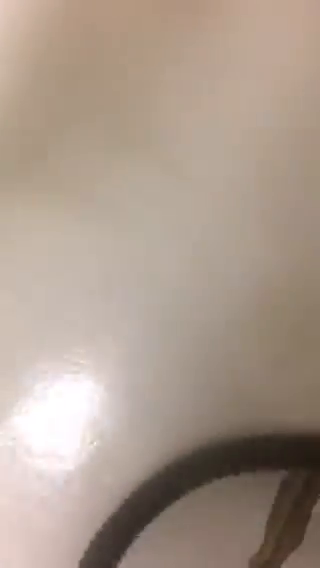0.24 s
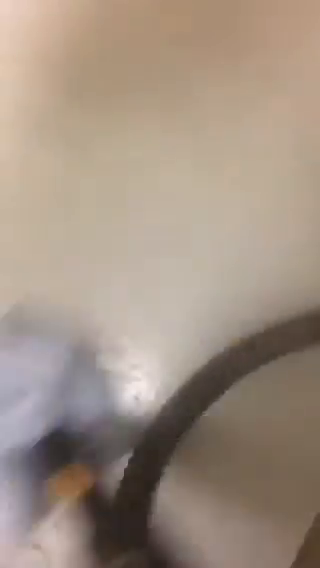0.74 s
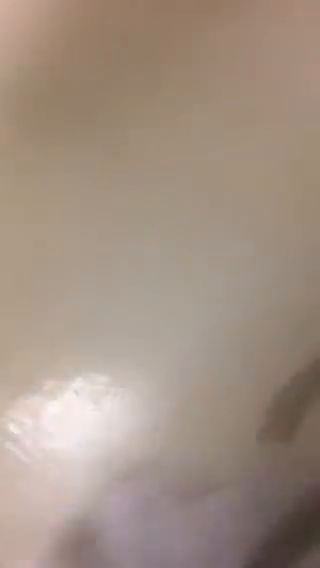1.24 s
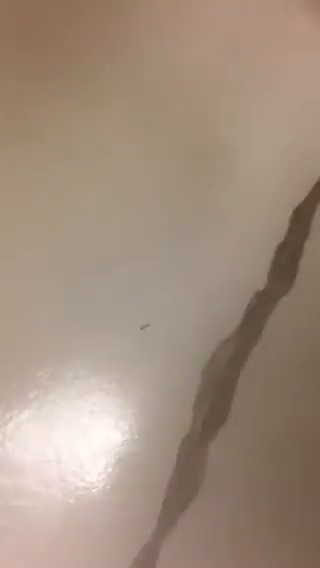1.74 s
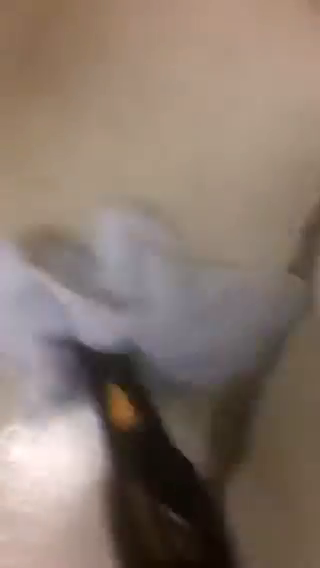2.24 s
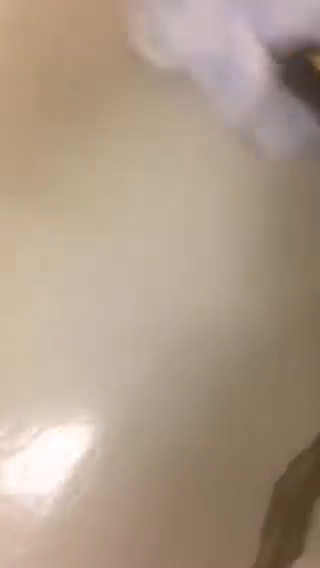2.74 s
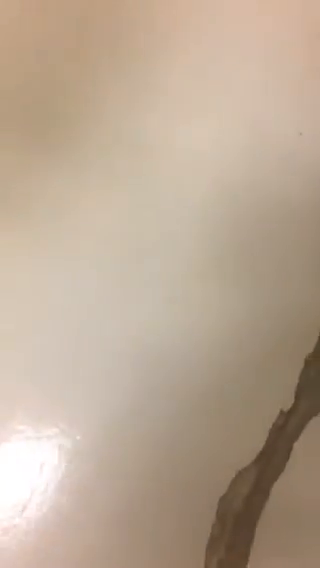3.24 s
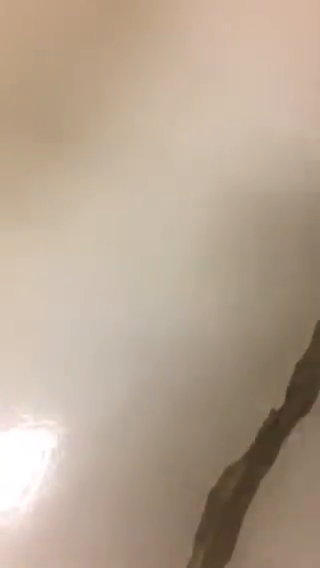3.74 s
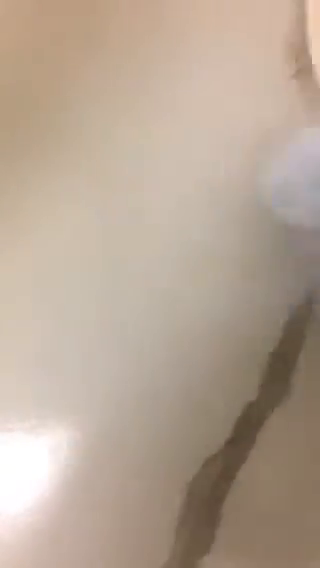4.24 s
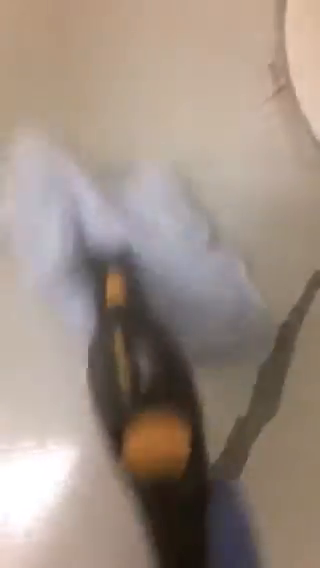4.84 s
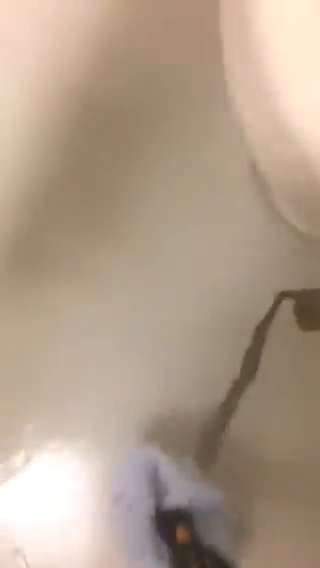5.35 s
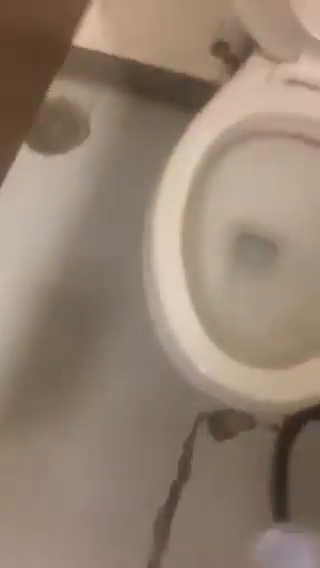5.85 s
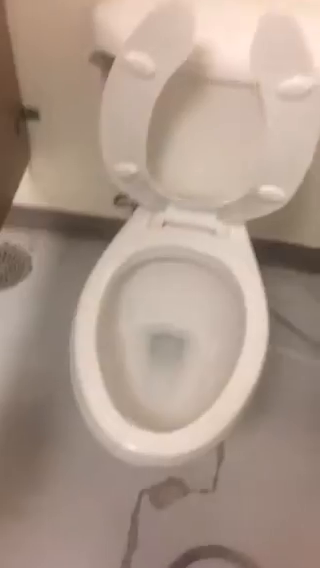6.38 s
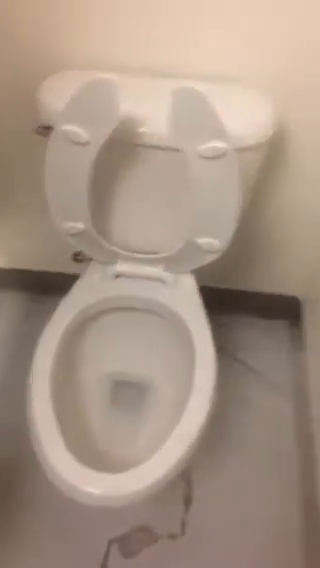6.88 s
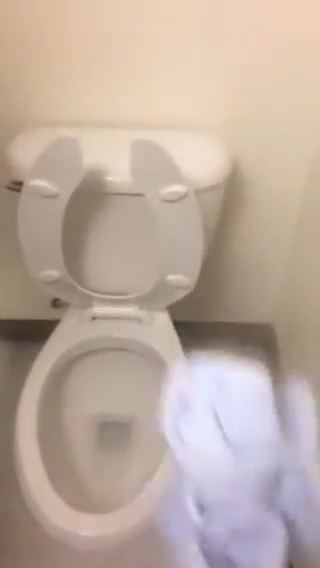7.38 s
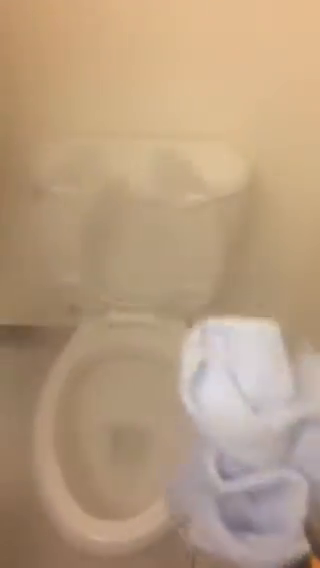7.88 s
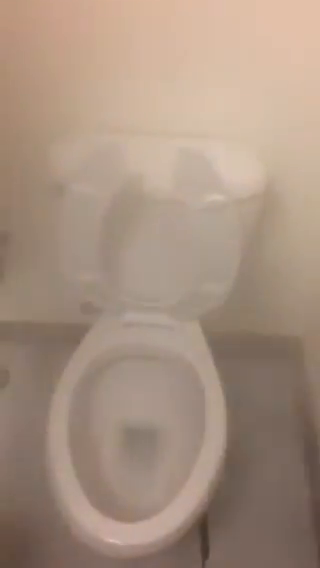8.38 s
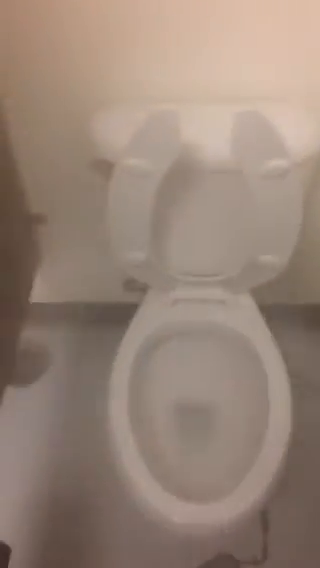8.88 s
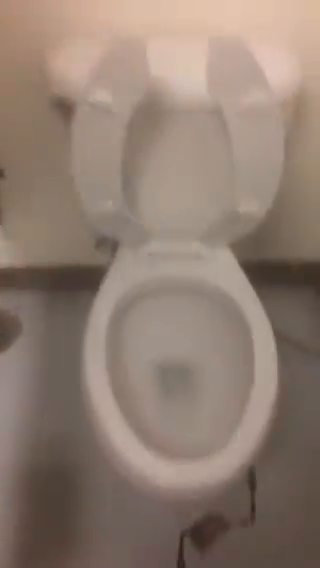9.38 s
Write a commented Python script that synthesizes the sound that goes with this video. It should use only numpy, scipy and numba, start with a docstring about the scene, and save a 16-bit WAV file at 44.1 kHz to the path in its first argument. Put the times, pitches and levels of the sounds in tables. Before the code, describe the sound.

Close, continuous steam fills the sound: a sputtering mid-range roar with airy hiss and sizzling edges, changing colour as cloth is pressed and dragged. A hollow plastic bump comes early, a small cluster of bumps later as the tool lifts, then an open, smoother jet. A hard valve knock stops it abruptly. A short tiled-room tail fades into quiet fan hum with tiny cloth rustles.

```python
"""In a hard, tiled restroom a steam cleaner with a cloth over its nozzle wipes the floor, then blows in the air.
Shaped noise makes the wet steam: a sputtering roar, a resonant pocket, singing folds, a hiss and a sizzle.
The tool bumps twice and the valve shuts with a knock: damped tones make both, and the room rings after them.
A fan hums throughout, made of steady tones and soft noise; faint rustles are short swells of noise."""
import sys
import numpy as np
from scipy import signal
from scipy.fft import rfft, irfft, next_fast_len
from scipy.io import wavfile
from numba import njit

SR = 44100
rng = np.random.default_rng(int(sys.argv[2]) if len(sys.argv) > 2 else 0)


def output_pcm(signal):
    """Save a mono or channel-first signal as 16-bit PCM at the path in sys.argv[1].

    Samples are clipped to [-1, 1] before scaling.
    """
    pcm = np.clip(np.atleast_2d(signal).T, -1, 1) * 32767
    wavfile.write(sys.argv[1], SR, np.round(pcm).astype(np.int16))


N = 424241
T = np.arange(N) / SR  # time of every sample in seconds
VALVE_S = 7.808  # the moment the valve shuts

# how long the room takes to fade by 60 dB at each pitch: pitch_hz, fade_60db_s
ROOM_FADE = [(60, 0.11), (250, 0.45), (500, 0.46), (800, 0.74), (4000, 0.75), (7500, 0.72), (10000, 0.52),
             (13000, .4), (16000, 0.3)]


def from_db(db):
    """Turn decibels into a gain."""
    return 10 ** (np.asarray(db) / 20)


def rms_one(x):
    """Scale a sound to unit average power."""
    return x / np.sqrt(np.mean(x ** 2) + 1e-20)


def in_time(rows):
    """Read the columns of a time table at every sample."""
    s, *columns = np.transpose(rows)
    return [np.interp(T, s, column) for column in columns]


def at_hz(points, hz):
    """Read a pitch table, with straight lines along log frequency."""
    f, value = np.transpose(points)
    return np.interp(np.log(hz + 1e-9), np.log(f), value)


def butter(x, hz, kind, order=2):
    """Filter a sound with a smooth Butterworth response."""
    safe_hz = np.clip(hz, 10, .45 * SR)
    return signal.sosfilt(signal.butter(order, safe_hz, kind, fs=SR, output="sos"), x + 1e-18)


def noise(spectrum):
    """Noise of a given colour, falling away beyond its ends; rms 1."""
    size = next_fast_len(N)
    hz = np.arange(size // 2 + 1) * SR / size + 1e-3
    skirts = np.minimum(1, np.minimum(hz / spectrum[0][0], spectrum[-1][0] / hz)) ** 2
    white = rfft(rng.standard_normal(size))
    return rms_one(irfft(white * from_db(at_hz(spectrum, hz)) * skirts, size)[:N])


def drift(rate):
    """Smooth random wandering with about rate turns a second; its spread is about 1."""
    slow = signal.resample_poly(rng.standard_normal(8000), 8, 1)
    return np.interp(T * rate * 8 + 100, np.arange(len(slow)), slow)


@njit
def resonate(x, hz, width_hz):
    """A two-pole resonance whose centre can move; its peak gain is 1."""
    out, band, low = np.zeros(len(x)), 0., 0.
    for i in range(len(x)):
        g = np.tan(np.pi * hz[i] / SR)
        damp = np.tan(np.pi * width_hz[i] / SR) * (1 + g * g) / g
        v = (band + g * (x[i] - low)) / (1 + g * (g + damp))
        band, low = 2 * v - band, low + 2 * g * v
        out[i] = damp * v
    return out


def resonant_noise(hz, width_hz):
    """Turbulence passed twice through a moving resonance, for steep skirts; rms 1."""
    width = width_hz * np.ones(N)
    once = resonate(rng.standard_normal(N), hz, width)
    return rms_one(resonate(once, hz, width))


def struck(start, modes):
    """Damped tones set ringing at one moment, neighbours in opposite phase."""
    out, first = np.zeros(N), int(start * SR)
    age = T[:min(SR, N - first)]
    for k, (hz, db, t60) in enumerate(modes):
        ring = from_db(db - 60 * age / t60) * np.sin(2 * np.pi * hz * age)
        out[first:first + len(age)] += (-1) ** k * ring
    return out


def echo(x, delay, gain):
    """Add one reflection from a hard surface."""
    return x + gain * np.interp(T - delay, T, x, left=0)


def restroom(x, wet_db, onset=0.015, early_db=3, early_s=.06):
    """Direct sound plus a dense tail, strongest in its early echoes, that dies band by band."""
    age, edges = T[:SR], np.geomspace(40, 19000, 13)
    tail = 0
    for low, high in zip(edges, edges[1:]):
        fade = from_db(-60 * age / at_hz(ROOM_FADE, np.sqrt(low * high)))
        tail = tail + butter(rng.standard_normal(SR), [low, high], "band") * fade
    tail = tail * (age > onset) * from_db(early_db * np.exp(-age / early_s))
    # even out the tail's average power between 500 and 8000 Hz
    tail = tail / np.sqrt(np.mean(np.abs(rfft(tail)[500:8000]) ** 2))
    return x + from_db(wet_db) * signal.fftconvolve(x, tail)[:N]


def swells(rows, rise_s):
    """An envelope of quick rises and slow fades."""
    out = 0
    for s, db, fade in rows:
        age = np.maximum(T - s, 0)
        out = out + from_db(db) * (1 - np.exp(-age / rise_s)) * np.exp(-age / fade)
    return out


def bell(middle, length):
    """A smooth swell from 0 to 1 and back, at least half high for the given length."""
    return 0.5 ** ((2 * (T - middle) / length) ** 2)


def ramp(middle, duration):
    """A smooth step from 0 to 1."""
    return .5 + .5 * np.sin(np.pi * np.clip((T - middle) / duration, -.5, .5))


def blend(pair, share):
    """Go from the first value to the second as share goes from 0 to 1."""
    return pair[0] + (pair[1] - pair[0]) * share


def fan():
    """Air rush that flutters a little, a hum beating against a slightly slower motor, and a few wavering tones."""
    # colour of the air rush: pitch_hz, level_db (per Hz)
    air_colour = [(40, -6.5), (60, 1.5), (90, -2), (140, -5.5), (205, 1), (320, -4), (430, -4), (600, -5.5),
                  (1080, -7.5), (1350, -12.5), (2100, -19.5), (3000, -27), (6500, -33), (16000, -44.5)]
    # motor hum, louder once the microphone faces the room: time_s, level_db (rms)
    hum_curve = [(0, -60.5), (5.4, -62.5), (5.9, -52.5), (7.7, -54), (8.3, -52.5), (9.62, -50)]
    # steady tones: pitch_hz, level_db (rms)
    steady_tones = [(224.5, -70), (307.5, -65.5), (360.7, -72), (408.3, -61.5), (441.6, -59.5),
                    (505.3, -70), (548.7, -67.5), (633.3, -72.5), (779.6, -71)]
    hum_hz, slip_hz = 120.6, 6.9  # the motor's tone lies slip_hz below the hum
    motor_db = -12.5  # relative to the hum
    air_db = -50
    hum_db, = in_time(hum_curve)
    motor = from_db(motor_db) * np.sin(2 * np.pi * (hum_hz - slip_hz) * T + .4 * drift(3))
    hum = from_db(hum_db + 1.0 * drift(8)) * (np.sin(2 * np.pi * hum_hz * T) + motor)
    tones = 0
    for hz, db in steady_tones:
        tones = tones + from_db(db + 3.0 * drift(5)) * np.sin(2 * np.pi * hz * T + 1.1 * drift(6))
    air = from_db(air_db + .8 * drift(14)) * noise(air_colour)
    return np.sqrt(2) * (hum + tones) + air  # root 2 turns the tones' rms into peak height


def rustles():
    """Small brushes of cloth in the room, a soft slide of the hose, and the dull rumble of a shifting grip."""
    # colour of the brushing cloth: pitch_hz, level_db (per Hz)
    cloth_colour = [(1200, -5.5), (2500, -1), (5000, -5), (8000, -6), (14000, -15)]
    # the cloth shifts: start_s, level_db, fade_s
    cloth_shifts = [(8.74, -66, 0.11), (9.216, -60, 0.041), (9.396, -54, 0.0097), (9.515, -66, .02)]
    # the hand shifts on the microphone's body: start_s, level_db, fade_s
    grip_shifts = [(0.0, -51, .3), (0.38, -52, .1), (1.98, -47, 0.089), (3.38, -47, .12)]
    hose_middle_s, hose_length_s, hose_db, hose_hz = 8.72, 0.2, -60, 1750
    brushes = swells(cloth_shifts, rise_s=.005) * from_db(2.0 * drift(200)) * noise(cloth_colour)
    hose_swell = from_db(hose_db) * bell(hose_middle_s, hose_length_s)
    slide = hose_swell * resonant_noise(hose_hz * np.ones(N), width_hz=1600)
    grip = swells(grip_shifts, rise_s=.015) * noise([(55, -6), (75, 6), (110, -9.0)])
    return restroom(brushes, wet_db=-5) + slide + grip


def bumps():
    """Blows on the hollow tool: a thud, duller where contact is soft, and a brief plastic clack."""
    # one bump, then another with two rebounds; a softer contact has a lower cut-off:
    # start_s, thud_gain_db, contact_cutoff_hz, clack_level_db, clack_pitch_hz
    blow_rows = [(2.899, -13, 190, -21, 1310), (5.617, -13.5, 1000, -25, 1000),
                 (5.636, -13, 420, -40, 1720), (5.662, -19.5, 900, -40, 1720)]
    # ringing of the hollow tool: pitch_hz, level_db, fade_60db_s
    tool_modes = [(75, -20, 0.055), (117, -14, 0.078), (183, -11.5, 0.22), (253, -8.5, 0.063),
                  (284.6, -6.5, 0.14), (320, -9.5, 0.12), (382, -6.5, 0.074), (530, -11.5, .05),
                  (630, -4, 0.053), (690, -10, 0.036)]
    clack_fade_s, clack_width_hz = 0.0074, 890
    blows = 0
    for s, db, soft_hz, clack_db, clack_hz in blow_rows:
        thud = from_db(db) * butter(struck(s, tool_modes), soft_hz, "low", order=4)
        clack_swell = swells([(s, clack_db, clack_fade_s)], rise_s=.001)
        clack = clack_swell * resonant_noise(clack_hz * np.ones(N), clack_width_hz)
        blows = blows + thud + clack
    return restroom(butter(blows, 65, "high"), wet_db=-2.5)


def valve(tick_db=-10, tick_s=0.0016, seat_hz=2600):
    """The valve shuts with a dull knock and thin tick, bounces and jolts the handle; the far wall answers the knock."""
    # ringing of the valve: pitch_hz, level_db, fade_60db_s
    valve_modes = [(730, -8.5, 0.015), (874, -4, 0.012), (1054, -4.5, 0.013), (1670, -11, 0.0096),
                   (1990, -10, 0.0074)]
    # it grazes its seat, hits it and bounces: after_closing_s, gain_db, contact_cutoff_hz
    seat_hits = [(-.012, -24, 1000), (0, 8.5, 5000), (.009, 6.5, 1000), (.0185, -3.5, 3980),
                 (.0275, -5.5, 1100)]
    # the jolt carried by the handle: pitch_hz, level_db, fade_60db_s
    jolt_modes = [(50, -23.5, 0.1), (85.4, -18, 0.055), (185, -18, 0.032)]
    wall_echo_s, wall_echo_db = 0.047, -16.5
    hits = 0
    for s, db, soft_hz in seat_hits:
        hits = hits + from_db(db) * butter(struck(VALVE_S + s, valve_modes), soft_hz, "low")
    dull = butter(butter(hits, 520, "high"), seat_hz, "low", order=6)
    knock = echo(dull, wall_echo_s, from_db(wall_echo_db))
    age = np.maximum(T - VALVE_S, 0)
    tick_noise = noise([(7500, -7), (10000, -7), (11700, 3), (13500, 0.5), (15500, -8.5)])
    tick = from_db(tick_db) * (age > 0) * np.exp(-age / tick_s) * tick_noise
    knock_in_room = restroom(knock, wet_db=-5.5, early_db=4.5, early_s=.07)
    return knock_in_room + restroom(tick, wet_db=-6) + struck(VALVE_S, jolt_modes)


def shut_off(flow, room_db=-4.0, empty_s=0.044):
    """After the valve shuts the nozzle quickly empties; the sound stored in the room dies band by band."""
    hz, s, bins = signal.stft(flow, SR, nperseg=256)
    age = np.maximum(s - VALVE_S, 0)
    room_share = min(from_db(room_db) ** 2, 1)
    stored = from_db(-60 * age / at_hz(ROOM_FADE, hz)[:, None]) ** 2
    power = (1 - room_share) * np.exp(-age / empty_s) + room_share * stored
    return signal.istft(bins * np.sqrt(power), SR)[1][:N]


def reflections(x, count=24, shortest_s=.0009, longest_s=.03, level_db=-3.5, pace=10.0, sway_s=.0003, sway_pace=3.0):
    """Floor, fixtures and walls send early echoes that come, go and glide as the nozzle moves; power is kept."""
    out, power, sway = x.copy(), 1, sway_s * drift(sway_pace)
    for delay in np.geomspace(shortest_s, longest_s, count) * rng.uniform(.9, 1.1, count):
        gain = from_db(level_db) / np.sqrt(count) * drift(pace)
        lag = np.maximum((delay + sway * rng.uniform(-1, 1)) * SR, 1).astype(int)
        out = out + gain * x[np.maximum(np.arange(N) - lag, 0)]
        power = power + gain ** 2
    return out / np.sqrt(power)


def surges(steady_db, steady_hz, rows):
    """Gain and pitch of a flow: each surge adds power and pulls the pitch towards its own, which sinks as it passes."""
    sag_octaves = 0.099  # from this far above its own pitch to as far below
    power = from_db(steady_db) ** 2
    pull = power * steady_hz
    for s, length, db, hz in rows:
        swell = from_db(db) ** 2 * bell(s, length)
        power = power + swell
        pull = pull + swell * hz * 2 ** (-sag_octaves * np.clip((T - s) / length, -1, 1))
    return np.sqrt(power), pull / power


def jet_motion(clear, loss_db):
    """Gains of hiss and sizzle, and the sizzle's pitch: pressing smothers the jet, leaks and lifting free it."""
    # the cloth's edge lifts and the jet leaks out: middle_s, length_s, hiss_db, sizzle_db, sizzle_hz
    leak_rows = [(0.14, 0.17, -34, -35.5, 12600), (0.352, 0.1, -31.5, -38, 12600),
                 (0.59, 0.13, -32.5, -43, 9500), (0.758, 0.1, -39, -35.5, 9900),
                 (1.03, 0.13, -40, -40, 11900), (1.27, 0.14, -38, -43, 11500),
                 (1.84, 0.21, -31.5, -38.5, 12900), (2.038, 0.24, -31, -30, 10800),
                 (2.274, 0.11, -29.5, -53.5, 10300), (2.79, 0.18, -33.5, -53.5, 11600),
                 (3.654, 0.1, -35, -43, 13000), (3.756, 0.055, -51, -30.5, 10800),
                 (3.857, 0.034, -42, -50, 11900), (4.282, 0.084, -45, -56, 11000),
                 (4.486, 0.082, -45, -39, 13300), (4.79, 0.08, -34, -47.5, 8000),
                 (5.295, 0.13, -35, -51, 12600), (6.06, 0.12, -30.5, -33, 11500),
                 (7.1, 0.22, -39, -37, 10000)]
    hiss_db, sizzle_db = (-32, -30.5), (-49, -36.5)  # each on the floor, in the air
    steady_sizzle_hz = 12300  # between leaks
    sizzle_smother = 1.5  # dB lost in a press for each dB of hiss
    leaking = sum(from_db(db) ** 2 * bell(s, length) for s, length, db, _, _ in leak_rows)
    hiss = np.sqrt(from_db(blend(hiss_db, clear) - loss_db) ** 2 + leaking)
    sizzles = [(s, length, db, hz) for s, length, _, db, hz in leak_rows]
    steady_db = blend(sizzle_db, clear) - sizzle_smother * loss_db
    sizzle, sizzle_hz = surges(steady_db, steady_sizzle_hz, sizzles)
    return hiss, sizzle, sizzle_hz


def folds():
    """Each fold of cloth rings the turbulence in a narrow resonance that glides while it swells and fades."""
    # a channel in the cloth sings, gliding as it narrows or widens:
    # middle_s, length_s, level_db, pitch_hz, glide_octaves (to either side of the middle)
    fold_rows = [(0.34, 0.092, -32.5, 7000, -.4), (0.571, 0.17, -27, 2430, -0.88),
                 (0.94, 0.091, -33, 4050, -0.13), (1.14, .13, -32.5, 3000, -.05),
                 (1.296, 0.054, -26, 2280, -.15), (1.567, 0.18, -32.5, 2560, 0.23),
                 (1.69, 0.17, -42, 660, 0.013), (2.283, 0.11, -38, 4800, -.9),
                 (2.45, 0.22, -28, 2770, -0.2), (3.0, 0.18, -34, 964, 0.091),
                 (3.04, 0.18, -33, 1450, -0.19), (3.2, .36, -31.5, 1670, .25),
                 (3.682, 0.15, -34.5, 7400, 0.98), (3.72, 0.12, -31, 3530, -.17),
                 (3.84, 0.065, -38, 8200, -.3), (4.082, 0.18, -33, 3670, .2), (4.27, .1, -38, 6600, 0.35),
                 (4.3, .3, -33.5, 1900, 0.0035), (4.46, 0.33, -32.5, 1350, -0.01),
                 (4.56, 0.12, -35.5, 4900, -.3), (4.72, 0.23, -35, 1850, -0.062),
                 (4.97, .16, -36, 1300, 0.054), (4.78, .1, -32, 2800, -0.44), (5.14, 0.22, -30, 2710, 0.14),
                 (5.398, 0.19, -33.5, 4670, -0.38), (6.102, 0.1, -38, 1630, -0.15),
                 (6.41, 0.1, -33, 2850, -0.02), (6.42, 0.09, -33, 5070, 0), (6.76, 0.29, -43, 1300, 0.19),
                 (7.0, .7, -39, 3700, 0), (7.242, 0.23, -36, 2310, -0.041)]
    width_share = 0.21  # width of the resonance as a share of its pitch
    out = np.zeros(N)
    for s, length, db, hz, octaves in fold_rows:
        near = np.abs(T - s) < 2 * length
        progress = (T[near] - s) / length
        pitch = hz * 2 ** (octaves * np.clip(progress, -1, 1))
        # a wider, higher resonance lets more noise through, so weaken it there
        rush = rng.standard_normal(N)[near] / np.sqrt(pitch)
        once = resonate(rush, pitch, width_share * pitch)
        sung = resonate(once, pitch, width_share * pitch)
        out[near] += from_db(db) * .5 ** (2 * progress ** 2) * rms_one(sung)
    return out


def steam():
    """Roar through the cloth, a resonant pocket and singing folds, the jet's hiss and a sizzle at the edge."""
    # colours of the cloth's roar and of the jet: pitch_hz, level_db (per Hz)
    roar_colour = [(150.0, -28), (330.0, -22.5), (450.0, -9.5), (700.0, -8.5), (950.0, -4.5),
                   (1100.0, -4.5), (1350.0, -0.0), (1900.0, 0.0), (2600.0, -6.5), (4000.0, -24.5)]
    hiss_colour = [(2000.0, -21.5), (3300.0, -3), (4200.0, -2.5), (5000.0, -3.5), (6500.0, 0.5),
                   (7300.0, -3), (8400.0, -8.5), (10200.0, -4.5), (11300.0, -11), (13000.0, -25),
                   (16000.0, -28.5)]
    # steam forced through the cloth, weaker once the tool is lifted: time_s, level_db
    roar_curve = [(0, -28.5), (0.58, -28), (0.72, -32.5), (1.0, -29.5), (1.45, -30), (1.65, -29),
                  (2.7, -29.5), (3.05, -26), (3.53, -30.5), (3.8, -27.5), (4.4, -29), (5.3, -29.5),
                  (5.46, -38), (5.58, -36.5), (5.8, -36), (6.12, -33), (6.45, -37), (7.76, -32.5)]
    # wiping strokes swell the pocket of steam under the cloth: middle_s, length_s, level_db, pitch_hz
    stroke_rows = [(0.552, 0.11, -23, 2750), (0.916, 0.19, -24.5, 2090), (1.2, 0.36, -29, 2500),
                   (1.555, 0.13, -25, 2700), (2.28, 0.26, -26.5, 2730), (2.48, 0.32, -28.5, 2450),
                   (3.69, 0.2, -26.5, 2820), (4.08, 0.19, -29, 2900), (4.758, 0.26, -24.5, 2390),
                   (5.17, 0.22, -28, 2410), (5.32, 0.09, -28.5, 2300), (5.572, 0.077, -28, 2500)]
    # the cloth is pressed flat and smothers the jet: middle_s, length_s, loss_db
    press_rows = [(0.0, 0.18, 3), (0.996, .16, 3), (1.65, .1, 1), (2.484, 0.16, 2), (3.165, 0.12, 2),
                  (3.94, 0.095, 2), (4.435, 0.089, 2.5), (5.043, 0.16, 3.5)]
    # the tool leaves the floor: the pocket opens first, then the cloth falls clear of the jet
    lifted = ramp(middle=5.44, duration=0.208)
    clear = ramp(middle=5.63, duration=0.98)
    # each pair: on the floor, in the air
    pocket_db, pocket_centre_hz = (-30.5, -29), (2560, 3270)
    pocket_width = (0.81, 0.96)  # as a share of its pitch
    sputter_depth = (2, 2)  # scales the wandering below, which is in dB
    pocket_smother = 0.76  # dB lost in a press for each dB of hiss

    roar_db, = in_time(roar_curve)
    loss_db = sum(db * bell(s, length) for s, length, db in press_rows)
    steady_db = blend(pocket_db, lifted) - pocket_smother * loss_db
    pocket_gain, pocket_hz = surges(steady_db, blend(pocket_centre_hz, lifted), stroke_rows)
    hiss_gain, sizzle_gain, sizzle_hz = jet_motion(clear, loss_db)
    width_hz = blend(pocket_width, lifted) * pocket_hz
    # water blocks and frees the weave in quick irregular bursts
    sputter_db = blend(sputter_depth, lifted) * (0.49 * drift(300) + 0.35 * drift(70))
    sputter = rms_one(from_db(sputter_db))
    roar = from_db(roar_db) * noise(roar_colour)
    pocket = pocket_gain * resonant_noise(pocket_hz, width_hz)
    hiss = hiss_gain * from_db(.5 * sputter_db + 1.05 * drift(18)) * noise(hiss_colour)
    sizzle = sizzle_gain * from_db(1.76 * drift(30)) * resonant_noise(sizzle_hz, width_hz=4300)
    reflected = reflections((roar + pocket) * sputter + hiss + sizzle)
    return shut_off(reflected + folds() * sputter)


def limiter(x, threshold_db=-4.5, release_db_per_s=22, attack_s=0.00054, ahead_s=0.0012):
    """A loud peak pulls the gain down just ahead of itself, and it climbs back slowly."""
    over_db = np.maximum(20 * np.log10(np.abs(x).max(axis=0) + 1e-9) - threshold_db, 0)
    held_db = np.maximum.accumulate(over_db + release_db_per_s * T) - release_db_per_s * T
    keep = np.exp(-1 / (attack_s * SR))
    ahead_db = np.interp(T + ahead_s, T, held_db)
    return x * from_db(-signal.lfilter([1 - keep], [1, -keep], ahead_db))


def scene():
    """All sources reach one microphone, the same in both channels."""
    mono = fan() + rustles() + bumps() + valve() + steam()
    return np.stack([mono, mono])


def record(dry):
    """A limiter turns loud peaks down, then everything above 16 kHz is cut steeply."""
    top_cut = signal.ellip(12, .1, 80, 16000, fs=SR, output="sos")
    return signal.sosfilt(top_cut, limiter(dry))


dry = scene()
out = record(dry)
output_pcm(out)
```